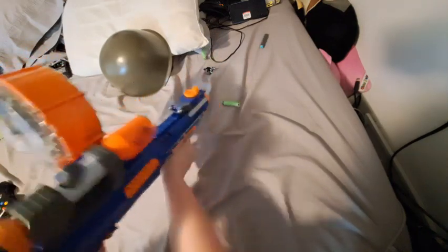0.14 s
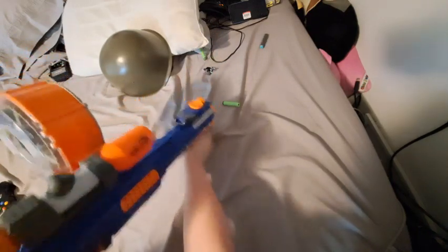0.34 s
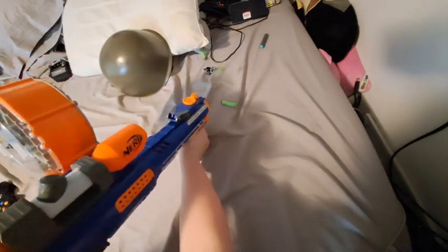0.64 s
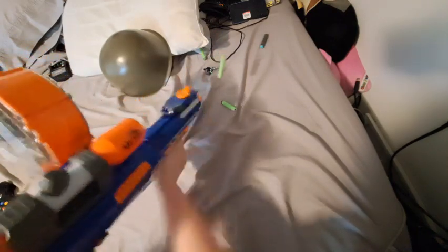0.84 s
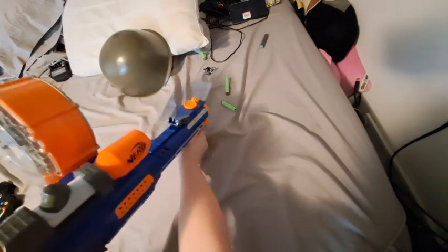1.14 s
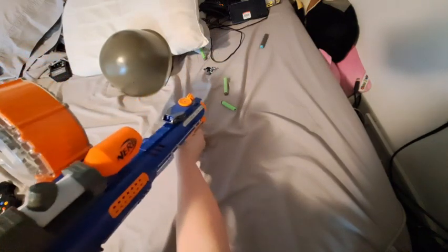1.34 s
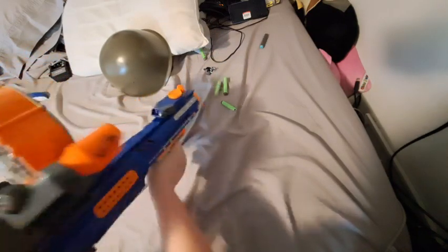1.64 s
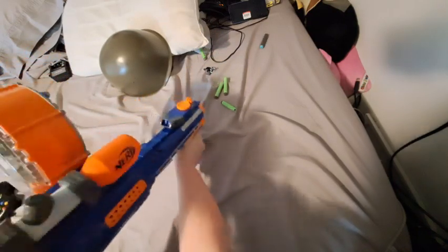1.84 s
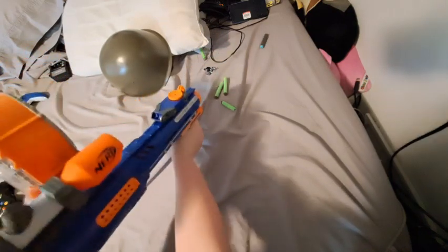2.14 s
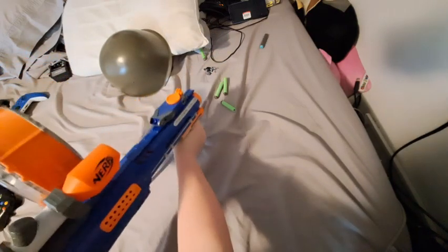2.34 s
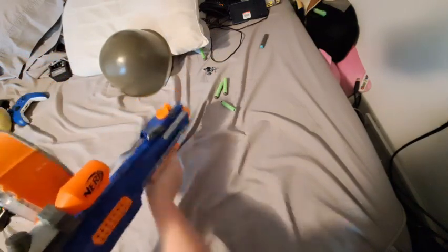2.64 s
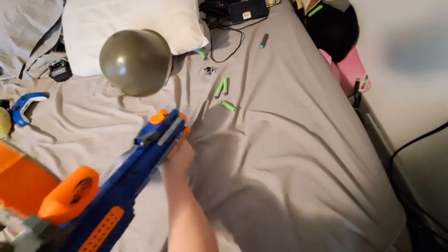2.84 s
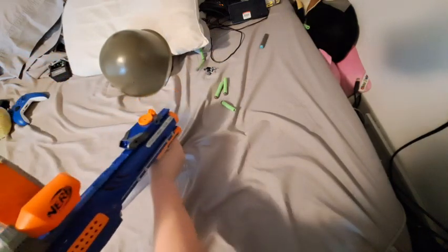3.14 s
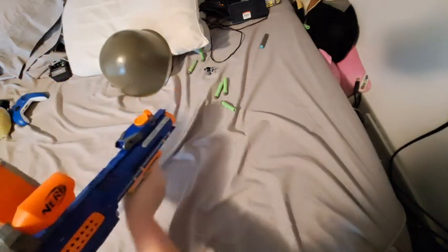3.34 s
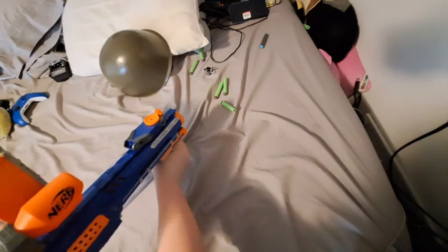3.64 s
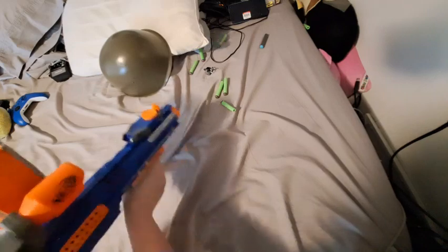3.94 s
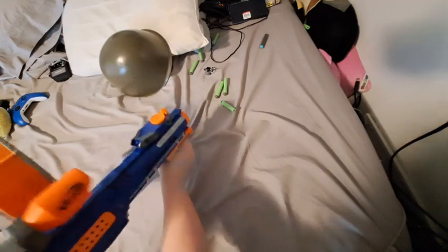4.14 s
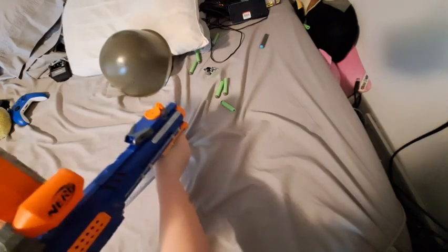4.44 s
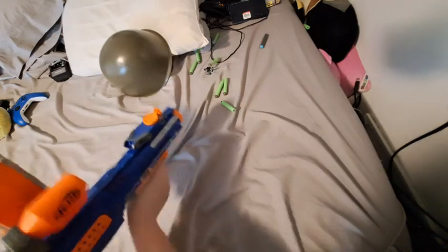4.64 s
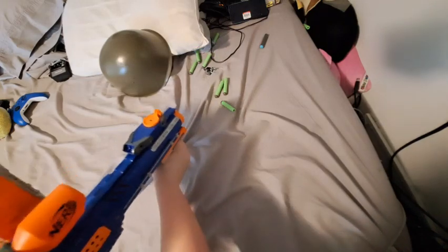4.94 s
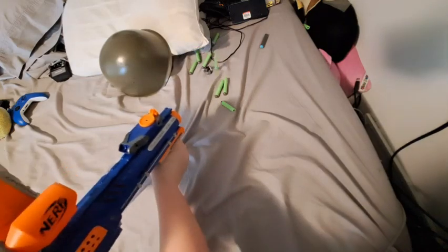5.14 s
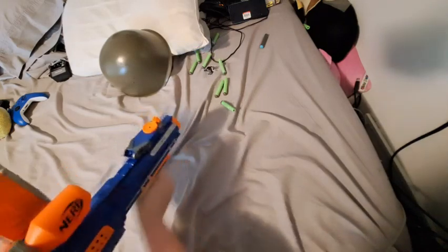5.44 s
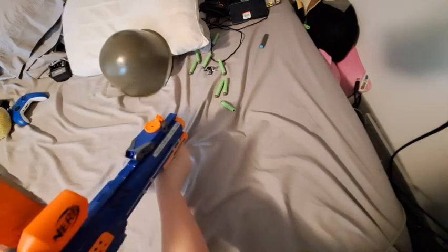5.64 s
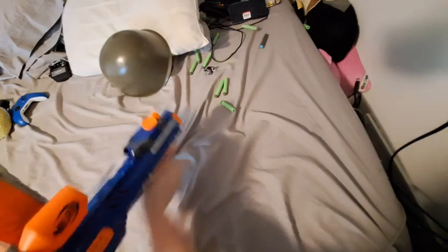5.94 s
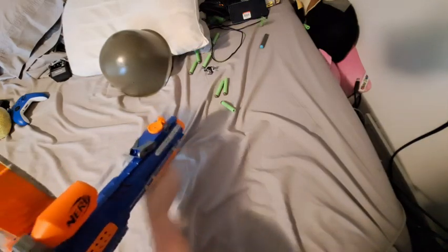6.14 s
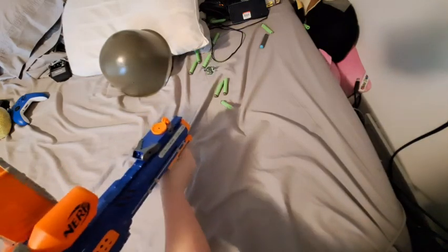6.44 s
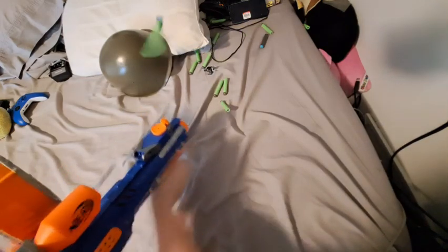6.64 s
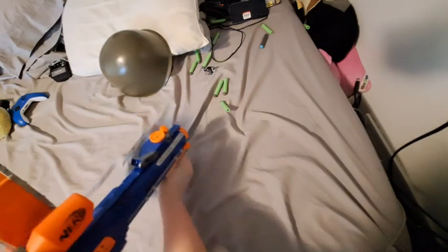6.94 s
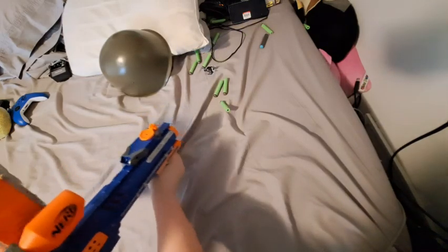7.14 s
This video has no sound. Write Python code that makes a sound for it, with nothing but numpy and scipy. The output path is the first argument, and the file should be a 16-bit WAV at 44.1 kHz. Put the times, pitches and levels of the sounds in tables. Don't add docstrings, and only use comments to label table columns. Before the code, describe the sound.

Close to a phone microphone in a small bedroom, a plastic spring-powered dart blaster is worked fast. Each cycle of about 0.7 seconds goes: crisp ratcheting clack as the grip is pulled back, rattly double clack as it slams forward, then a sharp hollow snap of the piston with a rebound knock. Ten cycles run evenly, with short soft room tails, little rattles and a low motor hum beneath.

```python
import sys
import numpy as np
from scipy import signal
from scipy.fft import rfft, irfft
from scipy.io import wavfile
from scipy.ndimage import uniform_filter1d

SR = 44100
rng = np.random.default_rng(int(sys.argv[2]) if len(sys.argv) > 2 else 0)


def waveform_to_disk(signal):
    frames = np.transpose(np.atleast_2d(signal))
    scaled = np.clip(frames, -1, 1) * 32767
    samples = np.round(scaled).astype(np.int16)
    wavfile.write(sys.argv[1], SR, samples)


def ratio(d):
    e = np.asarray(d, float) / 20
    return 10 ** e


N = 321048
LENGTH = 4096
LEAD_MS = 8

# hz, likeness_0_to_1, left_minus_right_db
PORTS = [(100, 1, -0.5), (380, 0.52, 2.5), (1230, 0, 2), (6170, 0, 4.5), (15700, 0, 1.5)]
# start_s, crack_db
LATCH = [
    (0.1089, -24.5),
    (0.8439, -21),
    (1.5706, -23.5),
    (2.52, -21.5),
    (3.2069, -25),
    (3.8929, -20.5),
    (4.5524, -20),
    (5.282, -20.5),
    (5.9467, -26.5),
    (6.656, -26),
]
CATCH = [(0.1333, -18.5), (0.8584, -16.5), (1.586, -15.5), (2.535, -18), (3.227, -17), (3.9051, -16),
         (4.5661, -15), (5.2963, -15), (5.9627, -16.5), (6.6784, -20.5)]
PAWL = [(0.1749, -13), (0.8853, -17), (1.6169, -16), (2.5661, -13), (3.2575, -19.5), (3.9335, -14),
        (4.5977, -14), (5.3267, -15), (5.9961, -14.5), (6.7095, -18)]
# start_s, crack_db, ring_db
RACK = [(0.1405, -23, -28), (0.1656, -17, -27), (0.8737, -17.5, -34), (1.5893, -27, -36),
        (1.6094, -16.5, -34), (2.5509, -23, -28), (2.5578, -20, -43), (3.2424, -21, -32),
        (3.2494, -21, -45), (3.921, -20, -23.5), (3.9256, -17, -24), (4.5844, -19.5, -26),
        (4.5897, -15, -34), (5.3182, -15.5, -28), (5.968, -20.5, -36), (5.9882, -19.5, -30),
        (6.0119, -18, -30), (6.673, -17, -49), (6.6938, -29, -28), (6.6998, -15.5, -39)]
REAR_STOP = [(0.1983, -16.5, -12), (0.9036, -13, -11.5), (1.6329, -13.5, -13), (2.585, -14, -10.5),
             (3.28, -14.5, -12), (3.9556, -13, -11.5), (4.6188, -17.5, -15), (5.3479, -14, -12.5),
             (6.0178, -13.5, -12), (6.7298, -14.5, -13)]
# start_s, crack_db, ring_db
SLACK = [(0.333, -27, -32), (1.0314, -38, -39), (1.0417, -30, -42), (1.0563, -29, -40),
         (1.7363, -38.5, -35), (1.7685, -26, -34), (1.7773, -29, -54), (1.799, -30, -37),
         (2.6963, -36, -37), (2.7044, -28, -36), (3.405, -41, -33), (3.415, -27, -35), (4.061, -44, -34),
         (4.07, -34, -34), (4.0802, -31, -40), (4.0864, -29.5, -30), (4.7115, -39, -32), (4.7248, -31, -30),
         (4.7423, -24.5, -29), (5.4294, -34, -36), (5.4564, -37, -34), (5.473, -27.5, -28),
         (6.13, -35, -36), (6.1538, -28, -29), (6.1635, -28, -34), (6.8336, -39, -34), (6.876, -37, -39),
         (6.8956, -28.5, -30.5)]
DRUM = [(0.364, -24.5, -34), (0.374, -28, -20.5), (1.0697, -25.5, -26), (1.086, -29, -25),
        (1.8056, -25, -23), (1.822, -28.5, -31), (2.7335, -27.5, -25), (2.7496, -29.5, -32),
        (2.7627, -42, -28.5), (2.7737, -25, -34), (3.444, -34, -24), (3.4542, -28, -28), (3.4705, -37, -23),
        (4.1097, -24.5, -31), (4.1219, -26, -19), (4.768, -24, -24.5), (4.7859, -26.5, -26),
        (5.5, -20.5, -21), (5.5128, -28, -23.5), (6.1723, -23, -23.5), (6.178, -36, -25),
        (6.1877, -23, -21), (6.9194, -22.5, -21.5)]
BREECH = [(0.3969, -14.5, -36), (1.1044, -18, -42), (1.1173, -15, -39), (1.8385, -13.5, -19),
          (2.78, -18, -43), (4.1377, -24, -39), (4.803, -22, -20), (5.5306, -27, -16), (6.2141, -20, -32),
          (6.9554, -17.5, -39)]
BOLT = [(0.408, -12.5, -36), (1.1114, -19, -49), (1.8435, -32, -25), (1.851, -12.5, -37),
        (3.4773, -13, -21), (4.1489, -10.5, -31), (4.813, -12, -23), (5.543, -12.5, -35),
        (6.2229, -16, -35), (6.9676, -15.5, -26)]
FRONT_STOP = [(0.418, -15.5, -19), (1.1287, -16, -21), (1.8626, -15, -20.5), (2.8256, -15.5, -29),
              (3.493, -13, -17), (4.16, -15.5, -16.5), (4.828, -14, -19.5), (5.5553, -21.5, -25),
              (6.2367, -12.5, -18), (6.9791, -12.5, -18.5)]
# start_s, crack_db
TRIGGER = [(0.5803, -34), (0.5934, -38), (1.309, -38), (1.3234, -39), (2.0684, -36), (2.088, -38),
           (2.8433, -54), (3.6351, -35), (3.6467, -38), (4.3104, -34), (4.3235, -37), (4.987, -37),
           (5.004, -45), (5.6913, -34), (5.709, -40), (6.357, -42.5), (7.108, -37), (7.1296, -52)]
SPRING = [(0.6378, -29), (0.6569, -20.5), (1.3653, -27), (2.1473, -30.5), (2.932, -21.5), (3.671, -37),
          (4.3739, -23.5), (5.0541, -30), (5.7597, -26), (6.434, -35)]
# start_s, crack_db, thump_db
RELEASE = [(0.6125, -22.5, -29), (1.345, -26, -26), (1.352, -19, -25), (2.1217, -16.5, -24),
           (2.8985, -25, -38), (2.905, -22, -30), (3.6652, -18.5, -24.5), (4.3483, -18, -29),
           (5.0289, -17.5, -23), (5.7346, -21, -23), (6.4097, -22, -33.5), (7.1619, -19, -25.5),
           (7.169, -30, -21)]
PISTON = [(0.6238, -11, -42), (1.358, -12, -39.5), (2.1332, -15, -55), (2.9101, -11, -32),
          (3.6767, -14, -43), (4.3591, -10.5, -47), (5.041, -8.5, -41), (5.7465, -13.5, -43),
          (6.4201, -12.5, -45)]
REBOUND = [(0.6517, -28, -27), (1.379, -15.5, -32), (2.1621, -16.5, -24), (2.941, -15.5, -23.5),
           (3.6975, -14, -35), (4.3808, -14.5, -27), (5.0612, -23, -34), (5.776, -16, -28),
           (6.4431, -16.5, -28.5), (7.1927, -12.5, -29)]
# start_s, crack_db, ring_db
RESET = [(0.7708, -34.5, -55), (0.7942, -35.5, -35.5), (1.5036, -39, -55), (1.5252, -41, -37),
         (2.272, -34.5, -49), (2.295, -37.5, -43), (3.0675, -36.5, -44), (3.094, -42, -38.5),
         (3.8226, -38.5, -43), (3.8506, -37, -36), (4.5003, -34.5, -37), (4.5212, -34.5, -33),
         (5.1847, -35, -40), (5.2113, -43, -34.5), (5.8868, -39.5, -44), (5.9122, -39, -36),
         (6.5675, -40.5, -43), (6.5936, -39.5, -40)]
# start_s, crack_db, ring_db
LOOSE = [(0.021, -49, -48), (0.048, -47, -46), (0.093, -41, -46), (0.254, -29.5, -35), (0.278, -38, -37),
         (1.5578, -38, -54), (1.994, -37, -41), (2.0456, -42, -49), (3.165, -48, -56), (3.196, -35, -55),
         (2.457, -43.5, -51), (2.44, -54, -60), (2.5085, -38, -53), (3.3393, -31.5, -37), (3.882, -35, -59),
         (4.0263, -33, -50), (4.8424, -25, -28.5), (5.252, -45, -40), (5.272, -33, -40), (5.3882, -33, -27),
         (6.7854, -32, -37)]
# start_s, crack_db
TICKS = [(0.009, -47), (0.3887, -33), (0.7145, -37.5), (0.7855, -40), (0.8336, -35), (1.0255, -40),
         (2.1024, -42), (2.2838, -36), (2.492, -46), (2.7104, -31), (2.7862, -27), (3.4835, -22),
         (3.6849, -27.5), (4.5404, -31.5), (4.6948, -31), (4.955, -49), (5.4658, -39), (5.5372, -13),
         (5.5465, -16.5), (5.9333, -38), (5.9819, -28), (6.379, -48), (6.6448, -35), (6.8287, -44),
         (6.9105, -30.5), (6.9625, -17), (3.4395, -27), (4.1435, -17.5), (3.2205, -24.5), (3.513, -27),
         (5.516, -25), (2.448, -52), (2.471, -55), (5.061, -13), (0.035, -57)]
# start_s, crack_db, ring_db
KNOCKS = [(0.1577, -47, -29), (0.3466, -42, -29), (2.7445, -45, -24), (3.3802, -44, -34),
          (4.0969, -36, -32), (4.1405, -27, -19), (4.6544, -28, -26), (4.6999, -50, -36),
          (5.4115, -46, -35), (5.4648, -45, -33), (5.797, -48, -27.5), (5.8942, -52, -36),
          (6.0413, -40, -25), (6.069, -43, -39), (6.2942, -55, -53)]
# start_s, crack_db, thump_db
THUMPS = [(0.1542, -50, -33), (0.277, -52, -35), (0.364, -47, -30), (0.869, -39, -28), (1.1047, -48, -30),
          (1.5997, -45, -25.5), (1.8115, -43, -31), (1.8507, -44, -28.5), (3.239, -49, -34),
          (3.358, -52, -35), (4.104, -45, -25.5), (4.354, -42, -27), (5.033, -22, -21), (5.309, -21, -26),
          (5.4614, -50, -38), (5.4993, -24, -26), (5.543, -45, -28), (5.5755, -50, -39), (5.9786, -40, -28),
          (6.690, -48, -40)]


def shape(table, hz, column=1):
    rows = np.array(table, float)
    return np.interp(np.log(hz + 1), np.log(rows[:, 0]), rows[:, column])


def colour(x, gain):
    n = x.shape[-1]
    return irfft(rfft(x) * gain(np.fft.rfftfreq(n, 1 / SR)), n)


def causal(table):
    cepstrum = irfft(np.log(ratio(shape(table, np.fft.rfftfreq(1024, 1 / SR)))))
    cepstrum[1:512] *= 2
    cepstrum[513:] = 0
    return irfft(np.exp(rfft(cepstrum)))[:512]


def port_noise(n):
    mid, side = rng.standard_normal((2, n))
    like = lambda hz: np.clip(shape(PORTS, hz), 0, 1)
    mid = colour(mid, lambda hz: np.sqrt((1 + like(hz)) / 2))
    side = colour(side, lambda hz: np.sqrt((1 - like(hz)) / 2))
    return np.array([mid + side, mid - side])


def loudness(rows, db):
    top = uniform_filter1d(np.mean(rows ** 2, axis=1), size=132, axis=1).max(axis=1)
    return rows * (ratio(db) / np.sqrt(top))[:, None, None]


def house():
    # hz, db_per_hz
    rumble_db = [(30, -4.5), (60, -15), (85, -22), (120, -10), (190, -18.5), (340, -23.5), (1190, -22.5),
                 (3140, -36), (16000, -65)]
    # hz, width_hz, over_rumble_db
    murmur = [(169, 21, 8), (250, 11, 4.5), (354, 31, 7.5)]
    # hz, level_db
    hum = [(57.3, -39.5), (98, -54), (186, -60), (355, -61)]

    def gain(hz):
        peaks_db = sum(db / (1 + ((hz - f) / width_hz) ** 2) for f, width_hz, db in murmur)
        return ratio(shape(rumble_db, hz) + peaks_db)

    rumble = colour(port_noise(N), gain)
    out = rumble * ratio(-47.5) / rumble.std()
    port_db, port_rad = np.array([[.4], [-.4]]), np.array([[.3], [-.3]])
    for hz, db in hum:
        drift = uniform_filter1d(rng.standard_normal(N), size=SR // 5) * np.sqrt(SR // 5)
        turn = 2 * np.pi * np.cumsum(hz * (1 + 0.00312 * drift)) / SR
        level_db = db + 1.08 * drift * np.log2(hz / 20) + port_db
        out = out + ratio(level_db) * np.sin(turn + port_rad)
    return out


def last_stroke():
    # hz, db_per_hz
    tail_db = [(300, -5), (2500, 10), (5000, -19), (15000, -21)]
    level_db, t60_s = -51, 0.44
    tail = colour(port_noise(N), lambda hz: ratio(shape(tail_db, hz)))
    return ratio(level_db) * tail / tail.std() * np.exp(-np.log(1000) * np.arange(N) / SR / t60_s)


def bedroom(x):
    # hz, t60_s, level_db
    walls = [(149, 0.3, -6), (1020, 0.25, -10.5), (2250, 0.2, -3.5), (5900, 0.24, -6), (11500, 0.2, -8.5)]
    right_lag_ms = 0.17
    late = colour(x[1], lambda hz: np.exp(-2j * np.pi * hz * right_lag_ms / 1000))
    out = np.array([x[0], late])
    echo, source = rfft(port_noise(N)), rfft(x[0])
    octave = np.log2(np.fft.rfftfreq(N, 1 / SR) + 1)
    for centre in np.arange(13, 29) / 2:
        hz = 2 ** centre
        share = np.sqrt(np.clip(1 - 2 * np.abs(octave - centre), 0, 1))
        keep = np.exp(-np.log(1e6) / shape(walls, hz) / SR)
        stored = signal.lfilter([1 - keep], [1, -keep], irfft(source * share, N) ** 2)
        build = int(SR * (.004 + 2 / hz))
        stored = uniform_filter1d(stored, size=build, origin=(build - 1) // 2)
        band = irfft(echo * share, N)
        out = out + ratio(shape(walls, hz, column=2)) * np.sqrt(np.abs(stored)) * band / band.std()
    return out


def ring(hz, t60_ms, db):
    t = np.arange(LENGTH) / SR
    out = 0
    for f, fall_ms, g in zip(hz.T, t60_ms.T, ratio(db).T):
        decay = np.exp(-np.log(1000) * t * 1000 / fall_ms[:, None])
        out = out + g[:, None] * np.sin(2 * np.pi * f[:, None] * t) * decay
    return out


def soft_push(pushes, modes):
    s, db = np.array(pushes, float).T
    hz, t60_ms, mode_db = np.array(modes, float).T
    bend = rng.standard_normal((len(s), len(hz)))
    body = ring(hz * (1 + .04 * bend), t60_ms + 0 * bend, mode_db + 0 * bend)
    push = signal.fftconvolve(body, np.hanning(90)[None], axes=1)[:, None, :LENGTH]
    out = np.zeros(N + LENGTH)
    for start, row in zip((s * SR).astype(int), loudness(push, db - 8.0)):
        out[start:start + LENGTH] += row[0]
    return out[:N]


def stock_jolts():
    # start_s, level_db
    jolts = [(0.905, -15), (1.637, -16.5), (2.122, -19), (2.588, -21), (2.915, -36), (3.282, -20.5),
             (3.669, -23), (3.957, -42), (4.622, -17), (5.03, -27), (5.353, -14), (6.022, -21),
             (6.733, -21), (7.167, -27), (0.05, -42), (0.28, -27), (2.04, -38), (3.52, -23), (3.99, -22),
             (6.42, -30), (6.06, -31), (6.26, -32), (5.6, -29), (6.9, -26), (6.985, -23)]
    # hz, t60_ms, level_db
    stock_modes = [(106, 17, -19), (143, 72, -2.5), (250, 88, -1), (300, 19, -6)]
    return soft_push(jolts, stock_modes)


def frame_shudders():
    # start_s, level_db
    shudders = [
        (2.13, -29),
        (2.905, -15),
        (3.67, -25),
        (5.035, -27),
        (7.16, -21),
    ]
    # hz, t60_ms, level_db
    frame_modes = [(51.7, 220, 12), (75, 120, -12)]
    return soft_push(shudders, frame_modes)


def plunger_air():
    # start_s, level_db
    shots = [
        (0.618, -35),
        (1.349, -20),
        (2.123, -23),
        (2.903, -18.5),
        (3.668, -20.5),
        (4.352, -20.5),
        (5.031, -18),
        (5.736, -49),
        (6.411, -29),
        (7.164, -17),
    ]
    # hz, t60_ms, level_db
    tube_modes = [(255, 50, -9), (364, 44, 3), (412, 38, 7)]
    return soft_push(shots, tube_modes)


def tones(rows, rise_ms, t60_ms, below_db):
    s, db, hz = np.array(rows, float).T
    ms = np.arange(2 * LENGTH) / SR * 1000
    swell = (1 - np.exp(-ms / rise_ms)) ** 2 * np.exp(-np.log(1000) * ms / t60_ms)
    out = np.zeros(N + 2 * LENGTH)
    for start, g, f in zip((s * SR).astype(int), ratio(db - below_db), hz):
        out[start:start + 2 * LENGTH] += g * np.sin(2 * np.pi * f * ms / 1000) * swell / swell.max()
    return out[:N]


def spring_twangs():
    # start_s, level_db, pitch_hz
    twangs = [(0.24, -43, 350), (1.89, -47, 358), (1.96, -49, 371), (2.03, -52, 365), (2.6, -45, 343),
              (3.36, -46, 368), (4.0, -44, 375), (4.19, -42, 369), (4.88, -51, 380), (5.9, -54, 336),
              (7.0, -49, 367)]
    return tones(twangs, rise_ms=25, t60_ms=290, below_db=1)


def bore_rings():
    stops = [(s, ring_db, 984) for s, _, ring_db in REAR_STOP + FRONT_STOP]
    return tones(stops, rise_ms=0.64, t60_ms=50.6, below_db=3.5)


def rib_tones():
    # start_s, level_db, pitch_hz
    ribs = [(0.09, -19, 2610), (0.1075, -16, 3020), (0.1316, -6, 3760), (0.1735, -9, 6670),
            (0.3955, -10, 4960), (0.5786, -21, 2220), (0.6105, -19, 2630), (0.623, -9, 7620),
            (0.842, -9, 2640), (0.8555, -3, 5690), (1.1089, -7, 4290), (1.3074, -33, 5740),
            (1.351, -13, 5500), (1.5693, -6, 4170), (1.7674, -10, 2160), (1.848, -7, 4750),
            (2.1206, -15, 5000), (2.5067, -23, 7900), (2.5187, -18, 3250), (2.7784, -7, 4140),
            (2.8235, -4, 7670), (2.9043, -22, 7240), (2.9103, -5, 7700), (3.2061, -14, 5470),
            (3.4755, -6, 4100), (3.6646, -18, 4600), (3.675, -9, 4930), (3.697, -13.5, 7020),
            (3.89, -14, 4050), (3.904, -3, 2720), (4.1425, -2, 7700), (4.3465, -16, 5340),
            (4.5516, -10, 4200), (4.564, -7, 5660), (4.8095, -12, 7600), (5.0287, -2, 2550),
            (5.0384, -2, 4900), (5.2814, -18, 3430), (5.294, -10, 4640), (5.4984, -17, 3990),
            (5.5358, -12, 7680), (5.7314, -17, 4900), (5.9454, -8, 3100), (6.4073, -7, 2060),
            (6.4186, -4, 7800), (6.6553, -10, 3770), (6.7276, -7, 5000), (6.9601, -2.5, 2150),
            (7.1591, -15, 2100), (7.1916, -10, 4620)]
    return tones(ribs, rise_ms=0.71, t60_ms=23, below_db=15)


def rasp(s, db, reach_s, below_db):
    # hz, db_per_hz
    rasp_db = [(250, -10.5), (900, 4.5), (8000, -14), (15500, -22)]
    order = np.argsort(s)
    s, db = s[order], db[order]
    t = np.arange(N) / SR
    k = np.clip(np.searchsorted(s, t), 1, len(s) - 1)
    push = ratio(np.minimum(db[k], db[k - 1]) - below_db) * (s[k] - s[k - 1] < reach_s)
    push = push + ratio(db[k] - 14.5) * np.exp(-np.abs(s[k] - t) / 0.0042)
    slips = ratio(7.2 * uniform_filter1d(rng.standard_normal(N), size=40) * np.sqrt(40))
    grit = signal.fftconvolve(rng.standard_normal(N) * slips, causal(rasp_db))[:N]
    return uniform_filter1d(push, size=176) * grit / grit.std()


def chatter(length_ms, rise, fall, grain_db):
    ms = np.arange(1024) / SR * 1000 - LEAD_MS
    contact, size = rng.standard_normal((len(length_ms), 2, 1024)).transpose(1, 0, 2)
    clumps = uniform_filter1d(size, size=16, axis=1) * 4
    before = np.exp(-(ms / (rise * length_ms[:, None])) ** 2)
    after = np.exp(-ms / (fall * length_ms[:, None]))
    return contact * ratio(grain_db * clumps) * np.where(ms < 0, before, after)


def crack(db, length_ms, bright_db):
    # hz, db_per_hz
    edge_db = [(710, -30.5), (1200, 1.5), (1440, -19.5), (1840, -0.5), (3210, -3), (3730, -2), (5310, 0),
               (6440, -5.5), (7730, 0), (8600, -9), (9680, -9), (12400, -5.5), (15500, -7.5)]
    shared, own = (chatter(length_ms, rise=0.38, fall=0.58, grain_db=3.5) for _ in range(2))
    hits = np.stack([shared + 1.21 * own, shared - 1.0 * own], axis=1)
    patches = uniform_filter1d(rng.standard_normal((len(db), 1, 513)), size=16, axis=2) * 4
    tilt = 0.57 * bright_db[:, None, None]
    hits = colour(hits, lambda hz: ratio(tilt * np.log2((hz + 500) / 5500) + 2.5 * patches))
    return loudness(signal.fftconvolve(hits, causal(edge_db)[None, None], axes=2), db)


def shell(modes, db, length_ms, rise, fall):
    hz, t60_ms, mode_db = np.array(modes, float).T
    bend, weight = rng.standard_normal((len(db), 2, len(hz))).transpose(1, 0, 2)
    body = ring(hz * (1 + .006 * bend), t60_ms + 0 * bend, mode_db + 1.5 * weight)
    blow = chatter(length_ms, rise, fall, grain_db=2.5)
    blow[:, int(LEAD_MS * SR / 1000)] += 1.15 * np.sqrt(np.sum(blow ** 2, axis=1))
    sound = signal.fftconvolve(blow, body, axes=1)[:, :LENGTH]
    sound = colour(sound, lambda f: 1 / np.sqrt(1 + (0.83 * hz[0] / (f + 1)) ** 2.9))
    return loudness(sound[:, None], db)


def blaster():
    # hz, t60_ms, level_db
    barrel_modes = [(820, 10, -34), (883, 27.4, 8), (1030, 35, 6.5), (1020, 17, -6), (1333, 15.6, 9),
                    (1560, 14.6, 9.5), (1770, 29, 4.5)]
    # hz, t60_ms, level_db
    hollow_modes = [(243, 37, 7), (350, 20, -19), (405, 47, 10), (514, 50, 12), (573, 34, 17),
                    (658, 55, 12)]
    # part, barrel_db, hollow_db (both over the last column of its rows), length_ms, bright_db
    voices = [(LATCH, -18, -15, 4.8, -1.5), (CATCH, -43, -39, 8.8, -0.32), (PAWL, -30, -50, 6.3, 8.1),
              (RACK, 0, -6, 2.7, 0.73), (REAR_STOP, -3, -7.5, 9.8, 0.47), (SLACK, 0, -3.6, 8.3, -1.5),
              (DRUM, 0, -4, 8.9, -4.5), (BREECH, 0, -27, 4.7, -6), (BOLT, 0, -38, 7.9, 0.7),
              (FRONT_STOP, -1, -7.5, 3.8, 4.8), (TRIGGER, -5, -9, 6.1, 0.29), (SPRING, -33, -49, 23, 7.4),
              (RELEASE, -1.7, 0, 7.5, 1.6), (PISTON, -18, 0, 2.3, 6.6), (REBOUND, 0.38, 0, 8.4, 3.4),
              (RESET, 0, -12, 7.2, -5.5), (LOOSE, 0, -1, 6.7, -2.2), (TICKS, -12, -36, 5.9, 5.1),
              (KNOCKS, 0, -20, 4, -6), (THUMPS, -10, 0, 3.3, -3)]
    knocks = []
    for part, barrel_db, hollow_db, length_ms, bright_db in voices:
        for row in part:
            knocks.append((row[0], row[1], row[-1] + barrel_db, row[-1] + hollow_db, length_ms, bright_db))
    s, crack_db, barrel_db, hollow_db, length_ms, bright_db = np.array(knocks, float).T
    lead = int(LEAD_MS * SR / 1000)
    out = np.zeros((2, N + 2 * LENGTH))
    layers = (crack(crack_db - 0.02, length_ms, bright_db),
              shell(barrel_modes, barrel_db - 0.42, length_ms, rise=0.29, fall=0.19),
              shell(hollow_modes, hollow_db + 0.051, length_ms, rise=0.28, fall=0.25))
    for rows in layers:
        for start, row in zip((s * SR).astype(int), rows):
            out[:, start:start + row.shape[1]] += row
    return out[:, lead:lead + N] + rasp(s, crack_db, reach_s=0.082, below_db=12.0)


def scene():
    pushes = stock_jolts() + frame_shudders() + plunger_air()
    rings = rib_tones() + spring_twangs() + bore_rings()
    return bedroom(blaster() + pushes + rings) + house() + last_stroke()


def top_cut(x):
    return signal.sosfilt(signal.butter(12, 16970, fs=SR, output="sos"), x)


def record(dry):
    band = lambda hz: (hz / (hz + 45)) ** 2 / np.sqrt(1 + (hz / 15750) ** 260)
    dry = dry + ratio(-72) * rng.standard_normal(dry.shape)
    left = colour(dry[0], lambda hz: ratio(shape(PORTS, hz, column=2) / 2))
    right = colour(dry[1], lambda hz: ratio(-shape(PORTS, hz, column=2) / 2))
    mix = colour(np.clip([left, right], -.88, .88), band)
    return top_cut(mix)


dry = scene()
out = record(dry)
waveform_to_disk(out)
```